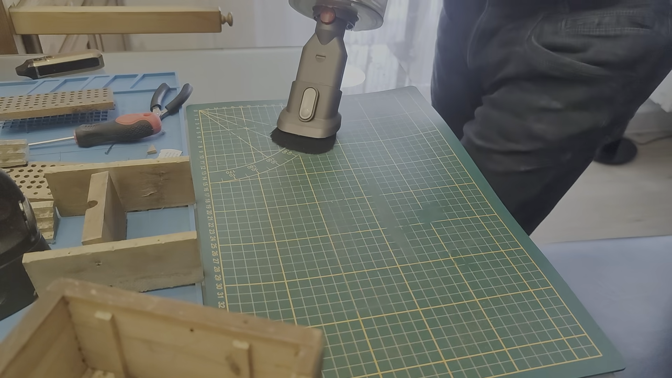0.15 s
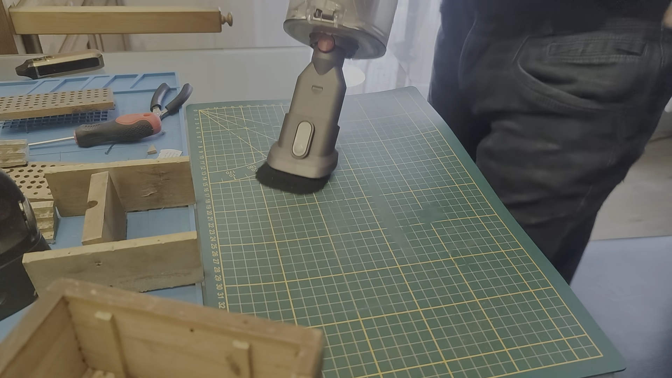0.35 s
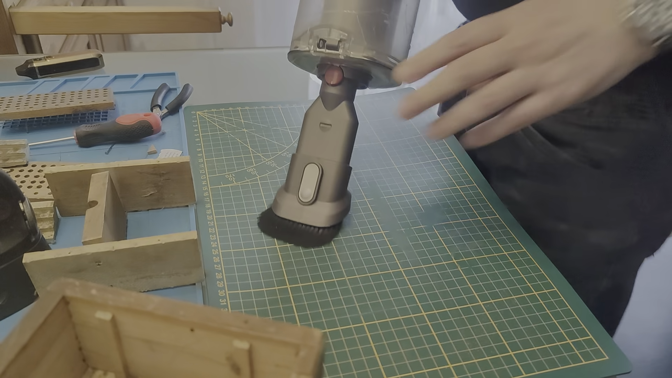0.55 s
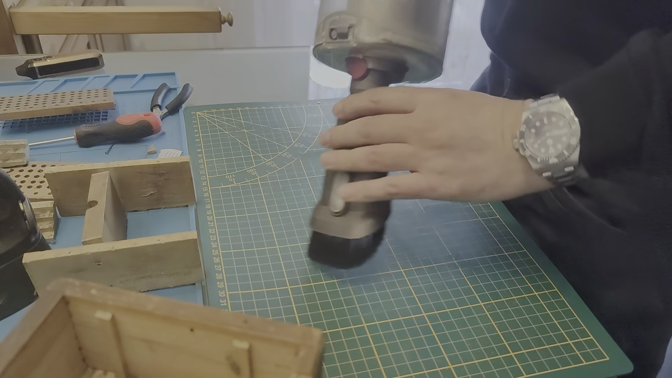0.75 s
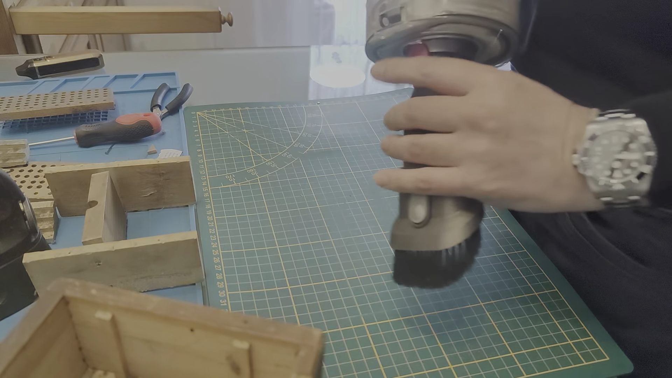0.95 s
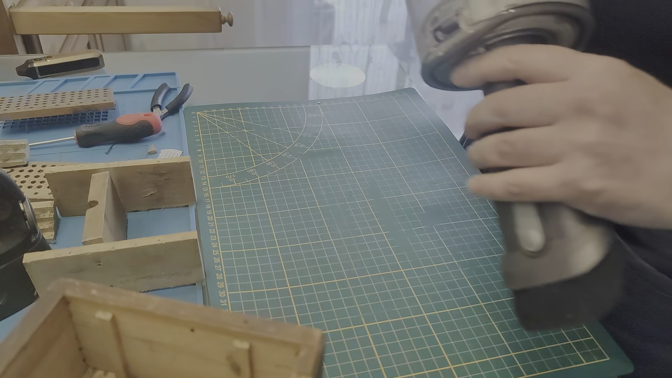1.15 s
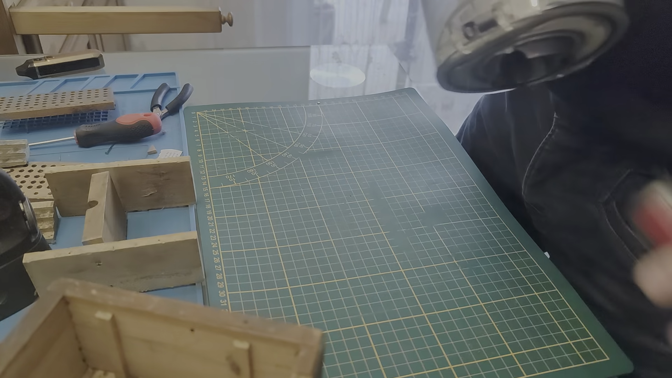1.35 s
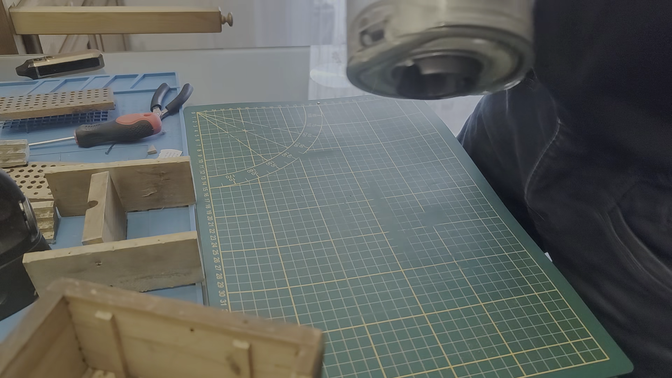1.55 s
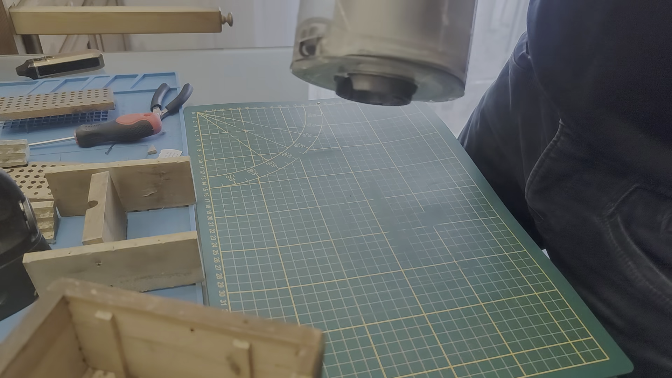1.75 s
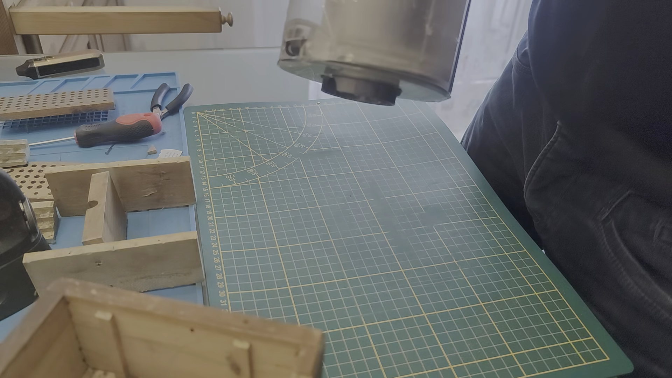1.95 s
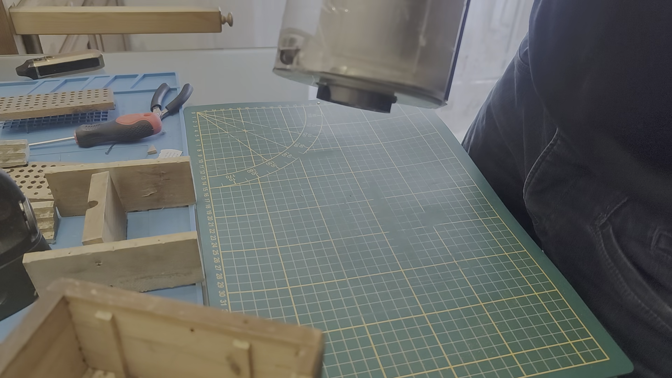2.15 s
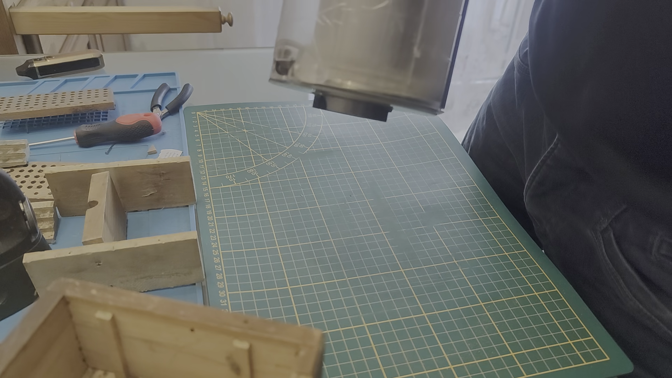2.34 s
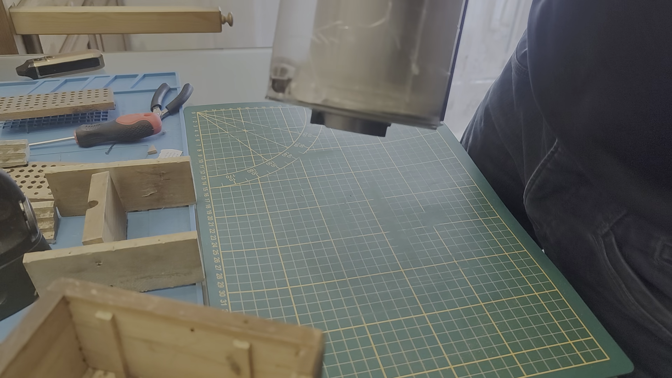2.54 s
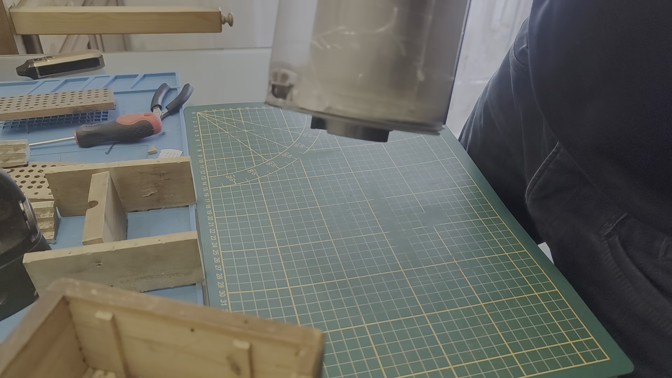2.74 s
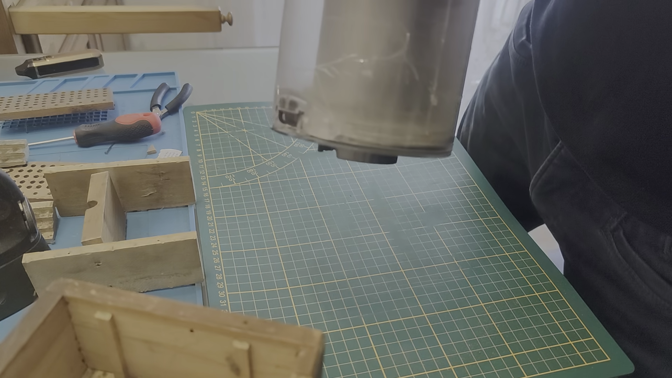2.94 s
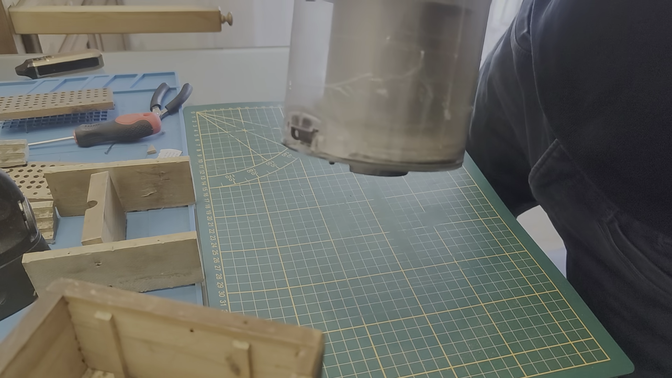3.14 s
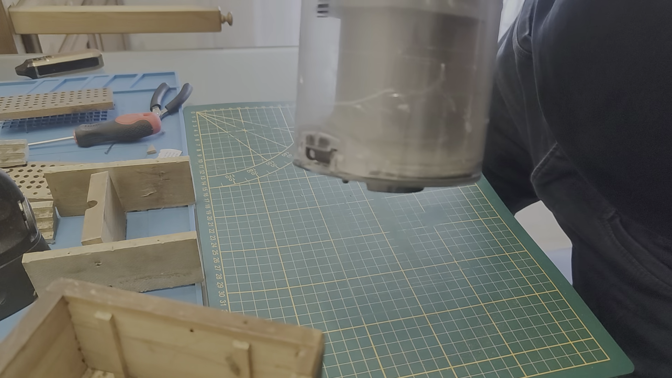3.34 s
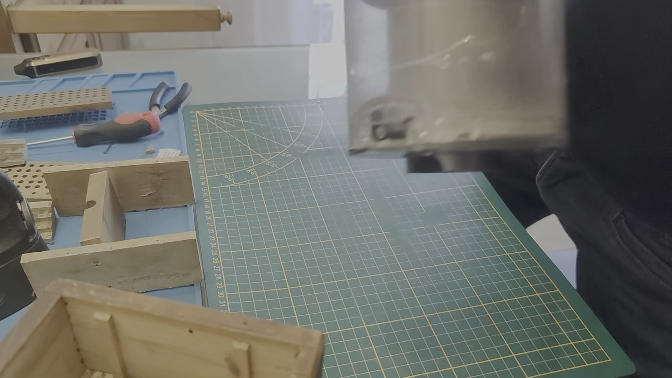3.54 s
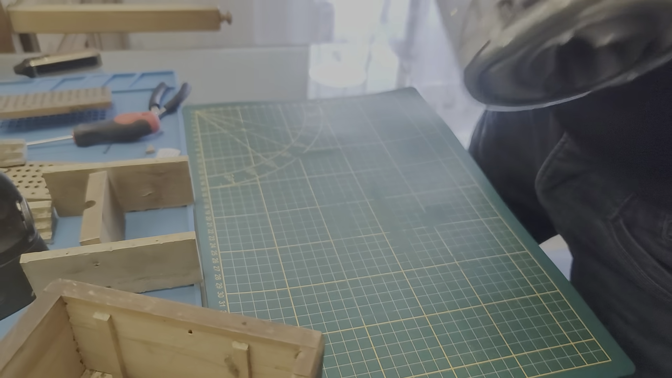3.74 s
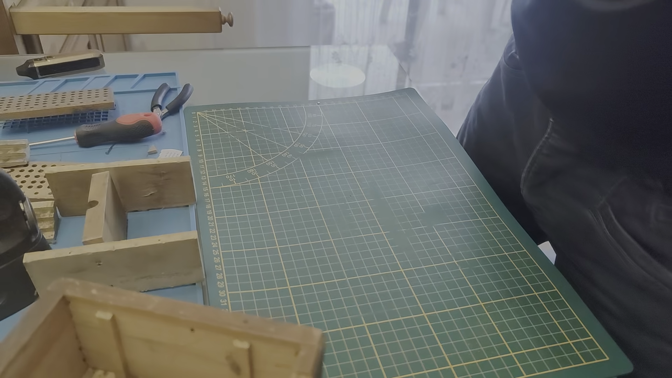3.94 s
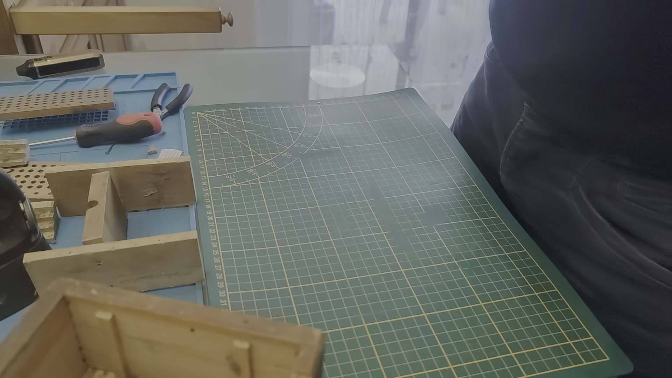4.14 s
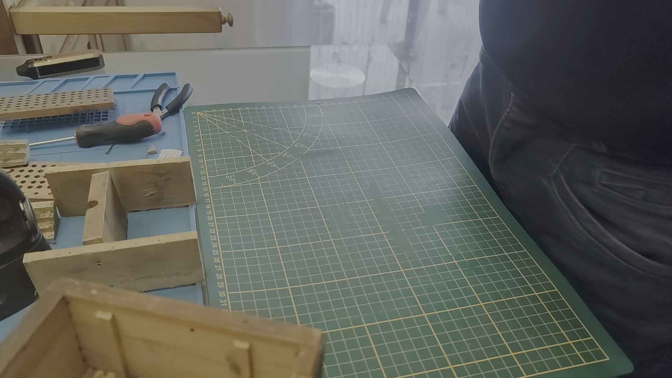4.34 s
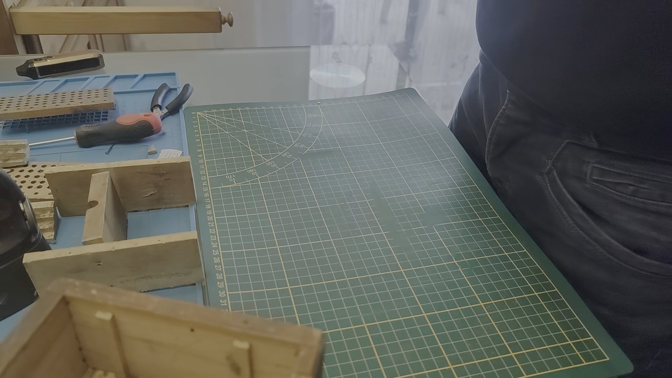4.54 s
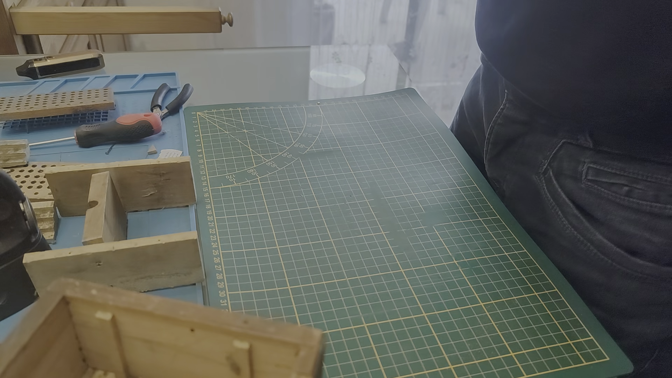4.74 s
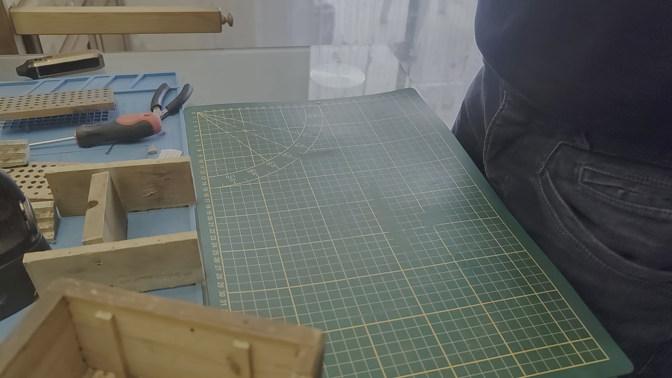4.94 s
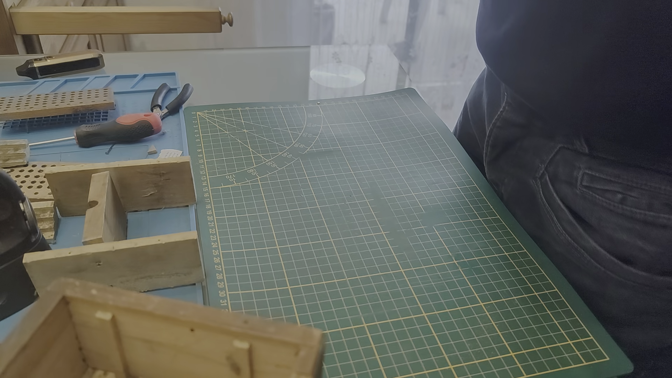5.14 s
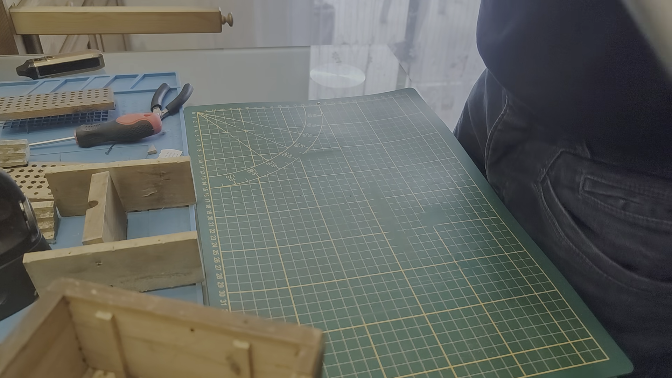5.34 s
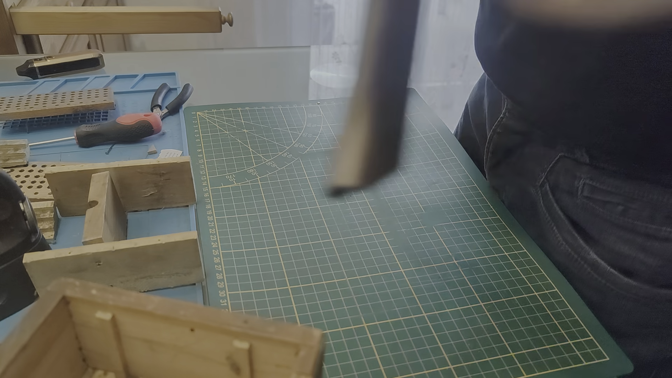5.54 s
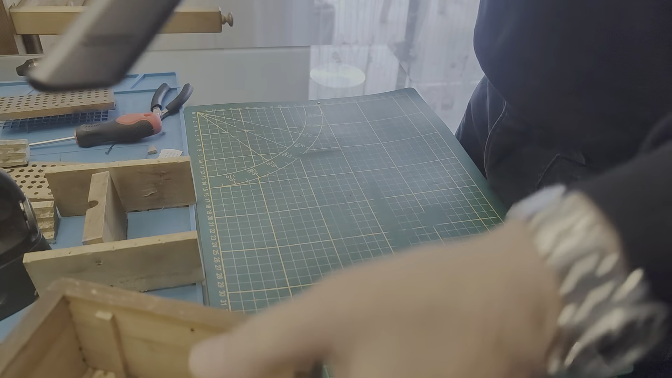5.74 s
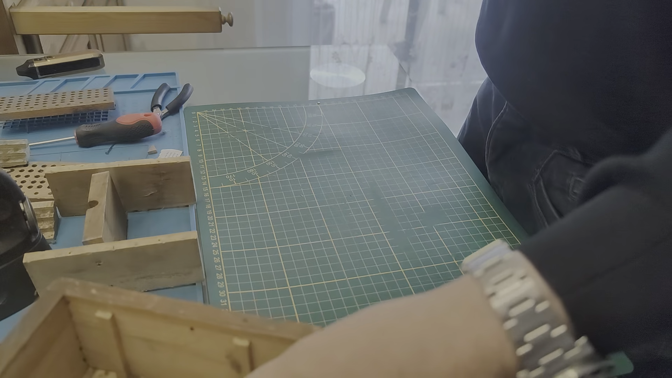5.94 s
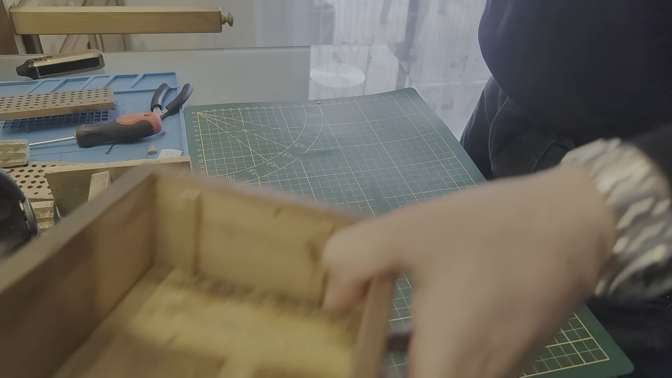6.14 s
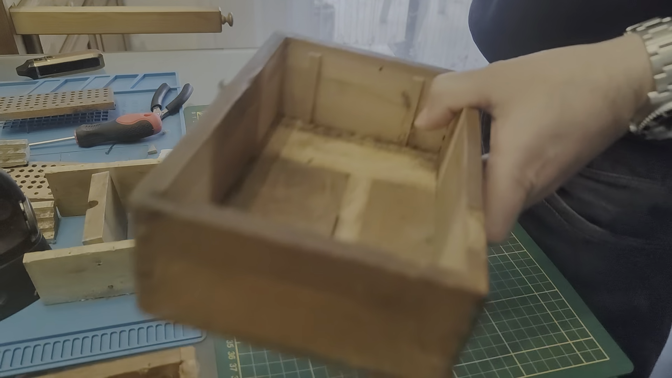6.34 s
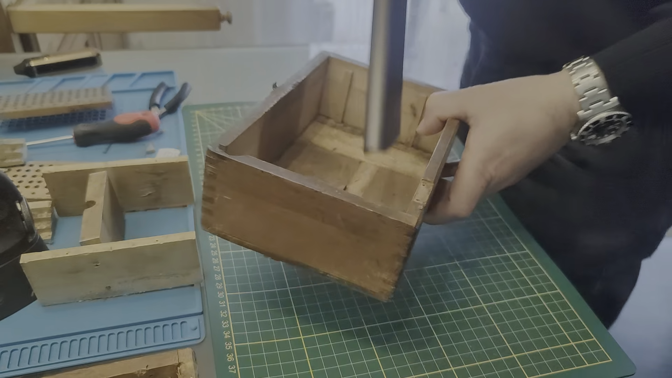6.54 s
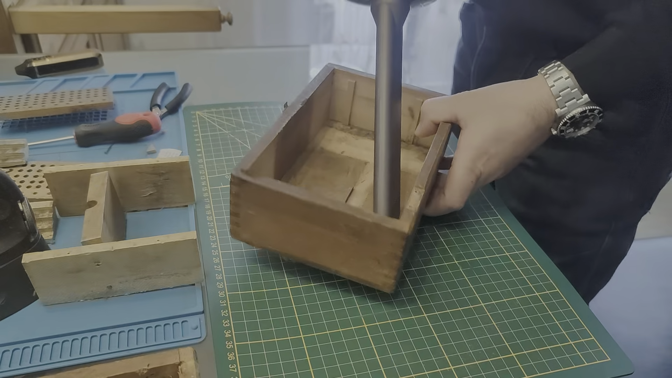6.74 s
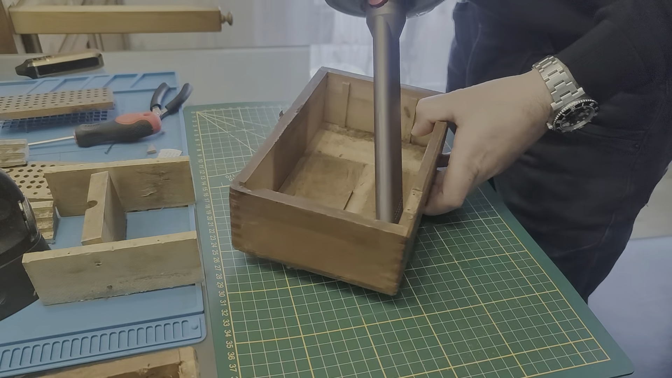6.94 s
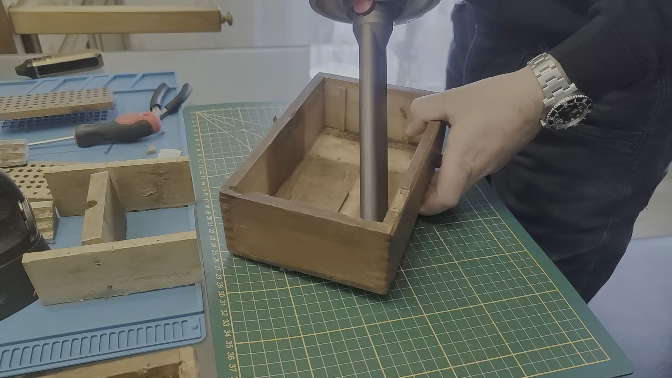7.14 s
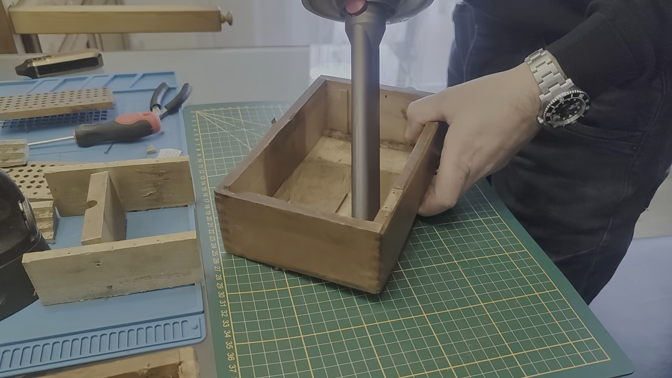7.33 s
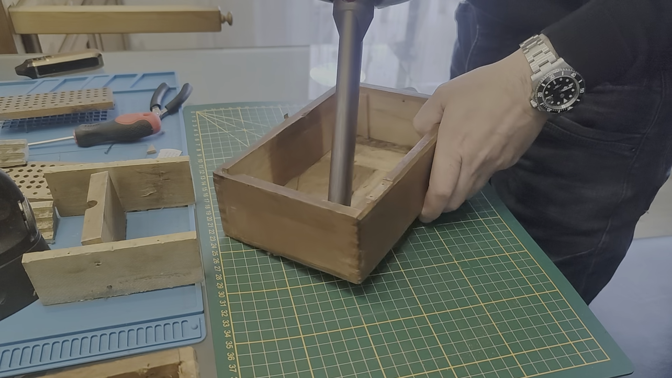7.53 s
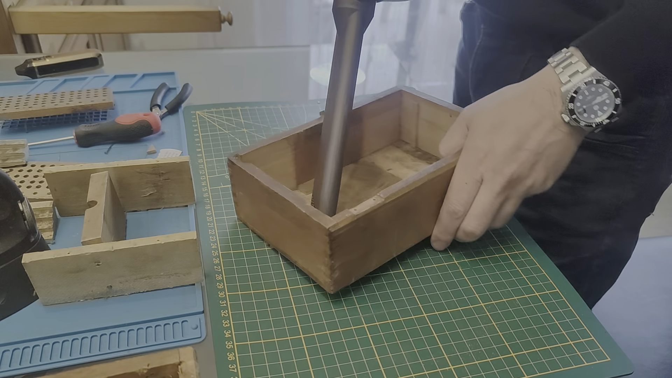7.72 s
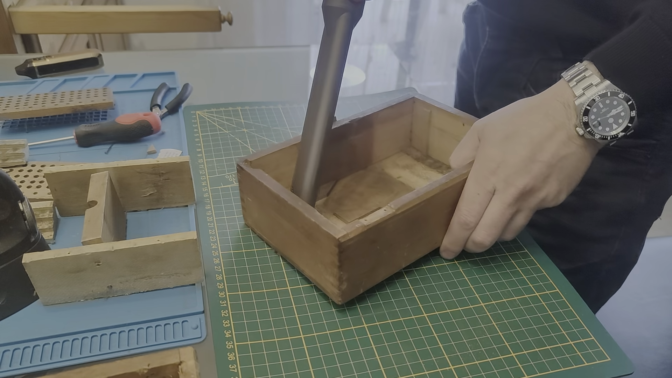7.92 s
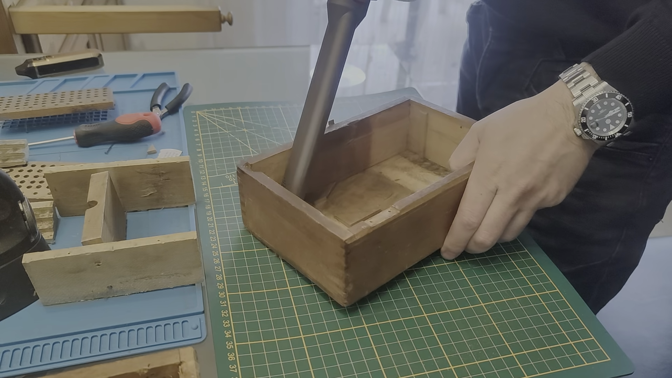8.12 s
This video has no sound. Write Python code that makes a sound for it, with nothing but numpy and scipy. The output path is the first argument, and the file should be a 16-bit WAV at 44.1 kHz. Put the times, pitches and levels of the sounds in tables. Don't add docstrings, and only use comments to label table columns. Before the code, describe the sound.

A handheld vacuum roars and whines, spins down with a fluttering hum, plastic attachments knock and snap into place, then the motor restarts inside a wooden box.

```python
import sys
import numpy as np
from scipy import signal
from scipy.fft import rfft, irfft
from scipy.io import wavfile
from scipy.ndimage import uniform_filter1d

SR = 44100
rng = np.random.default_rng(int(sys.argv[2]) if len(sys.argv) > 2 else 0)


def waveform_to_disk(signal):
    frames = np.transpose(np.atleast_2d(signal))
    scaled = np.clip(frames, -1, 1) * 32767
    samples = np.round(scaled).astype(np.int16)
    wavfile.write(sys.argv[1], SR, samples)


def gain_from_db(level_db):
    decades = np.asarray(level_db, float) / 20
    return 10 ** decades


N = 360738
FRAME, HOP = 512, 128
OFF_S, ON_S = .694, 6.861
FULL_HZ = 1173.8

# hz, likeness [0-1]
LIKENESS = [(60, 0.85), (200, 0.92), (700, 0.41), (1300, 0.18), (2400, 0.65), (4400, 0.033), (9000, 0.065)]
# hz, level_db
HOUSING = [(1700, 1), (2000, 1), (2400, -4), (2900, 1), (3300, -2.5), (3850, 3), (4300, -2), (4650, -6.5),
           (5050, 0)]
# hz, level_db
BLOW_COLOURS = [
    [(70, -30), (275, -2), (523, -6.5), (1010, -3.5), (2100, -10), (3000, -19), (6380, -23.5),
     (14000, -28.5)],
    [(59, -62), (100, -28), (229, -5.5), (360, -14), (523, -22), (1030, -17), (1500, -24), (2500, -20),
     (3500, -29), (14000, -44.5)],
    [(100, -31), (248, -12.5), (550, -12.5), (859, -1), (1050, -12), (2200, -22.5), (3230, -35),
     (14000, -52)],
    [(59, -27), (100, -5.5), (1380, -10), (6790, -23.5), (12600, -30), (14000, -54)],
    [(41, -41), (70, -18), (395, 0), (615, -21), (1200, -19), (2650, -7.5), (6740, -12.5), (14000, -23)],
    [(120, -53), (200, -29), (1180, -22.5), (1750, -7), (2230, -9), (2600, -10), (3900, -11), (4600, -14),
     (6100, -11), (9000, -12.5), (13000, -8), (14000, -12)],
    [(59, -35), (250, -5.5), (743, -5), (972, -4), (1380, -6), (2130, -12.5), (2620, -18.5), (14000, -37)],
]


def evened(x):
    return x / np.sqrt(np.mean(x ** 2) + 1e-20)


def read(points, hz):
    f, value = np.transpose(points)
    return np.interp(np.log(hz + 1), np.log(f + 1), value)


def likeness(hz):
    return np.clip(read(LIKENESS, hz), -1, 1)


def add(mix, s, sound):
    part = mix[round(s * SR):][:len(sound)]
    part += sound[:len(part)]


def gate_between(t, start, end, edge_s):
    return np.clip(np.minimum(t - start, end - t) / edge_s, 0, 1)


def band(colour, lo, hi):
    hz = np.fft.rfftfreq(FRAME, 1 / SR)
    power = gain_from_db(2 * read(colour, hz)) * (hz > lo) * (hz < hi)
    return -10 * np.log10(np.sum(power) / len(hz))


def noise(size, patchy_db, flicker_db):
    frames, hz = N // HOP + 5, np.fft.rfftfreq(FRAME, 1 / SR)[:, None]
    a, b, c, d, patches = rng.standard_normal((frames, len(hz), 5)).T
    flicker = evened(uniform_filter1d(patches[0], size=4))
    patches = uniform_filter1d(patches, size=6, axis=0)
    patches = evened(uniform_filter1d(patches, size=20, axis=1))
    same, left = likeness(hz), a + 1j * b
    right = same * left + np.sqrt(1 - same ** 2) * (c + 1j * d)
    z = np.array([left, right])
    unit = np.std(signal.istft(left[:, :FRAME], nperseg=FRAME, noverlap=FRAME - HOP)[1])
    z *= size(hz, np.arange(frames) * HOP / SR)
    z *= gain_from_db(patchy_db * patches + flicker_db * flicker)
    return signal.istft(z, nperseg=FRAME, noverlap=FRAME - HOP)[1][:, :N] / unit


def ring(modes, rise=.0012):
    t = np.arange(0, min(.5, max(m[2] for m in modes) + .01), 1 / SR)
    x = 0
    for hz, db, t60 in modes:
        x = x + gain_from_db(db - 60 * t / max(t60, .004)) * np.sin(2 * np.pi * (hz * t + rng.random()))
    x = x * (1 - np.exp(-t / rise))
    return x / abs(x).max()


def crack(colour, t60, rise=0.00078):
    t = np.arange(8192) / SR
    spectrum = rfft(rng.standard_normal(len(t)))
    x = irfft(spectrum * gain_from_db(read(colour, np.fft.rfftfreq(len(t), 1 / SR))))
    x = x * gain_from_db(-60 * t / np.clip(t60, .01, .25)) * (1 - np.exp(-t / rise))
    return x / abs(x).max()


def causal(gain_db):
    log_spectrum = np.conj(signal.hilbert(np.log(gain_from_db(gain_db))))
    return np.fft.ifft(np.exp(log_spectrum)).real[..., :1024]


def pulse(colour):
    x = causal(read(colour, abs(np.fft.fftfreq(2048, 1 / SR))))
    return x / np.linalg.norm(x)


def rustle():
    # hz, level_db
    quiet_colour = [(18, -35), (30, -10), (65, -7.5), (304, -10.5), (548, -19.5), (1200, -25.5),
                    (7950, -30), (14000, -27)]
    # hz, level_db
    rub_colour = [(60, -14), (200, 6), (600, 1.5), (1300, -0.5), (2000, 3), (4000, 3.5), (7000, 5),
                  (14000, -4.5)]
    # peak_s, rise_s and fall_s (per 20 dB; a negative rise means fading from the very
    # start), rustle_db, bass_db
    strokes = [(1.06, -0.5, 1.5, -59.5, -77), (1.33, 0.17, .25, -52.5, -49), (1.372, .05, 0.0145, -44, -43),
               (1.64, 0.13, 0.33, -63.5, -56.5), (1.74, 0.04, 1, -65, -55), (2.497, 0.11, 0, -60, -50),
               (3.62, 0.5, 0.2, -65.5, -79), (3.89, 0.4, 0.4, -66, -71.5),
               (4.035, 0.04, 0.07, -62.5, -60.5), (4.175, 0.05, 0.13, -54.5, -50.5),
               (4.58, .03, 0.05, -62, -61), (4.908, 0.16, 0.36, -57.5, -54.5), (5.02, 0.1, 0.11, -54, -47),
               (5.19, 0.07, 0.11, -47, -61), (5.31, 0, 0.07, -56, -60), (5.67, 0.2, 0.05, -59, -68),
               (6.069, 0.06, 0.12, -59.5, -52.5), (6.55, 0.97, .5, -61.5, -69.5), (6.82, 0.18, 1, -61, -60)]
    # start_s, end_s, level_db
    hisses = [
        (3.58, 3.72, -69),
        (5.658, 5.703, -56),
    ]
    quiet_db, hiss_above_hz = -65.5, 8300

    def size(hz, t):
        quiet = gain_from_db(quiet_db + band(quiet_colour, 0, SR / 2) + read(quiet_colour, hz))
        power = 0
        for s, rise, fall, db, bass_db in strokes:
            drop_db = 20 * np.maximum((s - t) / rise, (t - s) / fall)
            power = power + gain_from_db(2 * (np.array([[db], [bass_db]]) - drop_db).clip(-150))
        db, bass_db = 10 * np.log10(power)
        bass = 1 / (1 + (hz / 1400) ** 4)
        level_db = bass * (bass_db + band(rub_colour, 200, 1700))
        level_db = level_db + (1 - bass) * (db - 1.0 + band(rub_colour, 1500, 12000))
        hiss = sum(gain_from_db(d) * gate_between(t, a, b, .008) for a, b, d in hisses)
        hiss = hiss / (1 + (hiss_above_hz / (hz + 1)) ** 30)
        return np.hypot(quiet + hiss, gain_from_db(level_db + read(rub_colour, hz)))
    return noise(size, patchy_db=.8, flicker_db=.8)


def bin_hum():
    # start_s, end_s, pitch_hz, level_db, dip_s (at the end, it hastens the close)
    start, end, hz, db, dip = (3.5, 4.0, 495.5, -71, 4)
    t = np.arange(N) / SR
    gate = gate_between(t, start, end, 0.087) * (1 - .8 * np.exp(-((t - dip) / .03) ** 2))
    return gain_from_db(db) * gate * np.sin(2 * np.pi * hz * t)


def leak():
    # start_s, end_s, centre_hz, width_hz, level_db, fade_db per s
    start, end, centre_hz, width_hz, db, fade_db = (0.8, 2, 5552, 250, -63.5, -8)
    t = np.arange(N) / SR
    b, a = signal.iirpeak(centre_hz, centre_hz / width_hz, SR)
    whistle = evened(signal.lfilter(b, a, rng.standard_normal((2, N))))
    return gate_between(t, start, end, .05) * gain_from_db(db + fade_db * (t - start).clip(0)) * whistle


def thuds():
    # start_s, peak_db, ring_hz, t60_s
    bin_thuds = [(4.275, -31, 131.4, 0.1), (4.562, -54, 240, 0.071), (4.636, -36.5, 132, 0.12),
                 (4.926, -42.5, 129, 0.11), (5.084, -42, 130, 0.2), (4.5, -53.5, 200, .08),
                 (5.25, -52, 125, .1)]
    out = np.zeros(N)
    for s, db, hz, t60 in bin_thuds:
        add(out, s, gain_from_db(db) * ring([(hz, 0, t60), (1.6 * hz, -12, .08)], rise=0.0073))
    return out


def tube_bumps():
    # start_s, peak_db, ring_hz, t60_s
    bumps = [(1.257, -44, 1330, .03), (1.359, -38, 1230, .03), (2.217, -55, 665, .04),
             (2.246, -49, 894, 0.059), (2.462, -54, 980, .04), (2.472, -43, 990, .04),
             (2.484, -42, 1000, 0.049), (4.16, -43, 725, .07), (4.181, -43, 737, .08), (4.24, -51, 630, .1),
             (4.58, -54.5, 720, 0.072), (4.618, -52, 720, .07), (4.704, -31, 713, .08),
             (4.725, -42, 716, .1), (4.753, -44.5, 714, 0.096), (4.787, -48, 697, 0.078),
             (4.854, -43, 705, .1), (4.873, -44, 713, 0.089), (4.892, -44, 714, .1), (4.92, -47, 716, .08),
             (4.94, -41, 713, .08), (4.952, -36, 713, .08), (5.0, -38.5, 830, .05), (5.016, -42, 950, .03),
             (5.032, -30.5, 656, .05), (5.114, -49, 640, 0.1), (5.17, -52, 480, .05),
             (5.201, -50, 720, .06), (6.014, -45, 288, .065), (6.041, -48, 480, .065)]
    out = np.zeros(N)
    for s, db, hz, t60 in bumps:
        modes = [(hz, 0, t60), (.87 * hz, -5, .05), (.47 * hz, -11, .07), (1.7 * hz, -16, .02)]
        add(out, s, gain_from_db(db) * ring(modes, rise=0.00078))
    return out


def rocking():
    # start_s, peak_db
    taps = [(2.547, -39), (2.569, -37.5), (2.597, -46.5), (2.674, -51), (2.707, -45), (2.775, -48.5),
            (2.813, -46.5), (2.882, -52.5), (2.913, -48), (2.987, -53), (3.014, -50.5), (3.094, -55),
            (3.115, -54), (3.186, -54.5)]
    # pitch_hz, level_db, t60_s
    rocker = [(222.6, 6.5, 0.13), (286, 7, 0.3), (310, 0, .15), (349, 0.5, 0.22), (436, 0, 0.068),
              (724, -6, 0.041), (856, 1.5, 0.065), (1070, -2, 0.032), (1336, -5, 0.027)]
    out = np.zeros(N)
    for s, db in taps:
        modes = []
        for hz, d, t60 in rocker:
            mode_db = d + 1.2 * (hz < 500) + rng.uniform(-3, 3)
            modes.append((hz * rng.uniform(0.97, 1.035), mode_db, t60))
        add(out, s, gain_from_db(db + 2.0) * ring(modes, rise=.0004))
        add(out, s, gain_from_db(db - 8.0) * crack(BLOW_COLOURS[2], t60=.02))
    return out


def ticks():
    # start_s, peak_db, ring_hz, ring_db (re tick)
    small_ticks = [(0.8953, -33, 2260, -1), (1.113, -45.5, 3200, -5), (1.258, -39, 1490, -9),
                   (1.3001, -45, 1310, -5), (1.3176, -44, 3730, -5), (1.3595, -29, 1710, -8),
                   (1.3645, -31, 3010, -3), (1.3684, -30.5, 3000, -8), (1.3763, -30, 2820, -9),
                   (1.4464, -32, 2000, -6), (2.707, -49, 1000, -3), (3.8847, -47.5, 2450, -2),
                   (3.9429, -47, 1580, -3.5), (4.0767, -50.5, 6600, -9), (4.161, -50, 6400, -10.5),
                   (4.1894, -37.5, 2200, -9), (4.5717, -41.5, 3600, -9), (4.6181, -37.5, 2670, -16),
                   (4.7046, -40, 3620, -8), (4.7507, -47.5, 1300, -1), (4.948, -23, 5670, -15),
                   (4.999, -20, 3300, -9), (5.033, -36, 1980, -5), (5.2035, -35, 3680, -7),
                   (5.3366, -9, 2950, 1), (5.3392, -13, 1800, 1), (5.6794, -44, 1730, -11),
                   (5.7282, -51.5, 6200, -3), (5.9504, -51, 2040, -10), (6.0013, -55, 2080, -9.5),
                   (6.773, -51, 5900, -2.5)]
    # hz, level_db
    tick_colour = [(200, -9), (1500, -1.5), (4000, -3), (6000, -5), (14000, -10.5)]
    near, far = np.zeros((2, N))
    for s, db, hz, ring_db in small_ticks:
        add(near, s, gain_from_db(db + ring_db) * ring([(hz, 0, .017), (1.6 * hz, -9, .012)], rise=.0004))
        add(near, s + .0008, gain_from_db(db - 3.0) * pulse(tick_colour))
        add(near, s, gain_from_db(db - 3.5) * crack(tick_colour, t60=0.035))
        add(far, s, gain_from_db(db + 8.5) * pulse(tick_colour))
    return near, far


def knocks():
    # start_s, peak_db, blow_t60_s, room_db, snap_db (re blow)
    hits = [
        (1.862, -14, 0.054, -5, -16),
        (2.278, -22, 0.033, -10.5, -7),
        (2.495, -16, 0.051, -7, -5),
        (3.317, -24.5, 0.055, -2, -21.5),
        (3.3296, -22, 0.13, -7, -11),
        (5.334, -11, 0.04, 8.5, 17),
        (6.83, -12, 0.071, -7.5, -7),
    ]
    # pitch_hz, level_db, t60_s
    bodies = [
        [(969, 2, 0.067), (1380, -6, 0.11), (240, -11.5, 0.21)],
        [(222, 2, 0.23), (211, -2, .3), (441, -7.5, 0.24), (920, 9, 0.027), (2110, -3, .03)],
        [(226.4, -5.5, 0.25), (290, -2, 0.4), (801, 2, 0.05), (1000, -1, 0.037), (1296, 1, 0.064)],
        [(815, -1, 0.14), (390, -4, 0.08), (250, -4, .12)],
        [(420, 4.5, 0.079), (1360, 1, 0.09), (1055, 1.5, 0.1)],
        [(1760, 3.5, 0.04), (2260, 0, .04), (3950, -0.5, .03), (2920, 8, 0.017), (5670, 0.5, 0.037)],
        [(1000, 1.5, 0.056), (1330, 6.5, 0.024), (1540, 2, .012), (2700, -3, .015), (3400, -3, .018),
         (5900, -12, .015), (306, -5, 0.11)],
    ]
    near, far = np.zeros((2, N))
    for (s, db, t60, room_db, snap_db), colour, modes in zip(hits, BLOW_COLOURS, bodies):
        body, snap = gain_from_db(-3.5) * ring(modes), pulse(colour)
        add(near, s, gain_from_db(db - 4.0) * body)
        add(near, s, gain_from_db(db - 5.0) * crack(colour, t60, rise=0.0017))
        add(near, s + .0027, gain_from_db(db + snap_db) * snap / abs(snap).max())
        add(far, s, gain_from_db(db + room_db + 16.5) * snap)
        add(far, s, gain_from_db(db - 16) * body)
    return near, far


def flap():
    # time_s, pitch_hz, level_db, third_overtone_db
    hum = [
        (0.92, 136, -56, -60),
        (0.974, 136, -40, -59),
        (1.046, 136, -40, -59),
        (1.116, 149, -54, -64),
        (1.25, 153, -53, -63),
        (1.442, 157, -55, -72),
        (1.816, 158, -59, -76),
        (1.9, 160, -62, -78),
        (2.25, 162, -65, -80),
    ]
    second_db, second_fade_db = -16, -30
    t = np.arange(N) / SR
    s, *curves = np.transpose(hum)
    hz, db, third_db = [np.interp(t, s, curve) for curve in curves]
    turn = 2 * np.pi * np.cumsum(hz) / SR
    flutter_db = 1.5 * evened(uniform_filter1d(rng.standard_normal((2, N)), size=1500, axis=1))
    second = gain_from_db(second_db + second_fade_db * (t - s[0]).clip(0)) * np.sin(2 * turn)
    low = gain_from_db(db + 2 + flutter_db[0]) * (np.sin(turn) + second)
    third = gain_from_db(third_db + .5 + 2 * flutter_db[1]) * np.sin(3 * turn)
    return gate_between(t, s[0], s[-1], .015) * (low + third)


def speed(t):
    first_hz, coast_s, drag_hz = 1169.4, .225, 100
    ramp_hz_per_s, creep_hz, creep_s = 11700, 372, .1
    sag_s, sag_hz = 7.78, 1.4
    since = (t - ON_S).clip(0)
    first = (first_hz + drag_hz) * np.exp(-(t - OFF_S).clip(0) / coast_s) - drag_hz
    sag = sag_hz * np.clip((t - sag_s) / 0.067, 0, 1)
    second = np.minimum(ramp_hz_per_s * since, FULL_HZ - creep_hz * np.exp(-since / creep_s) - sag)
    return np.array([first, second]).clip(1)


def airflow():
    # hz, level_db
    roar = [(40, -36.5), (95, -20.5), (135, 6.5), (180, -5.5), (230, -0.5), (500, -7), (1000, -2),
            (1500, -9.5), (2000, -5.5), (3600, -3), (5600, 1.5), (6350, 7.5), (7400, 2), (14000, 3.5)]
    # airflow_db, bass_db and treble_db (re airflow), treble_drift_db per s, lag (factor on the dB-
    # per-dB speed law above the bass)
    air_runs = [
        (-23, -12.5, -14.5, -0.3, 1.08),
        (-22.5, -14, -14.5, -1.5, 2.3),
    ]
    air_law, bass_law, treble_law = 2.18, 1.15, 2.5
    surge_db, surge_s, gust_db = 6, 0.29, 0.4

    def size(hz, t):
        total, since = 0, (t - ON_S).clip(0)
        gust = gust_db * evened(uniform_filter1d(rng.standard_normal(len(t)), size=24))
        bass, treble = 1 / (1 + (hz / 1300) ** 4), 1 / (1 + (8000 / (hz + 1)) ** 12)
        slow = 1 / (1 + (hz / 3000) ** 2)
        speeds_db = 20 * np.log10(speed(t) / FULL_HZ)
        surges = 0, surge_db * np.exp(-since / surge_s)
        for run, speed_db, age, surge in zip(air_runs, speeds_db, (t, since), surges):
            db, bass_db, treble_db, drift_db, lag = run
            quick_law = air_law + treble * (treble_law - air_law)
            law = slow * bass_law + lag * (1 - slow) * quick_law
            tilt_db = bass * (bass_db + 11.0) + treble * (treble_db + 9.0 + drift_db * age)
            total = total + gain_from_db(db + tilt_db + law * speed_db + (1 - bass) * (surge + gust))
        colour_db = read(roar, hz) + 0.53 * read(HOUSING, hz)
        return total * gain_from_db(colour_db + band(roar, 1500, 8020) - 3.5)
    return noise(size, patchy_db=1.2, flicker_db=.4)


def motor():
    # time_s, half_length_s, whine_change_db, shaft_change_db
    turns = [(0.07, .02, -11, 0), (.2, 0.11, 1, 4), (0.443, 0.14, -6, -1), (.655, .04, -7, 8),
             (.78, 0.044, 3, 3), (.85, .04, 3, 9.5), (6.92, .035, -8, 0), (7.042, .05, 1, 4.5),
             (7.2, .07, 3, -6), (7.334, .04, -2, 8), (7.39, 0.022, -17, -6), (7.46, 0.058, 1.5, -17),
             (7.564, .02, -15, -2), (7.66, 0.033, -10, -6), (7.975, 0.21, -7.5, 7.5), (7.1, 0.042, -9, 2)]
    blades, neighbour_db = 9, -13
    whine_level_db, whine_law = -38, 3.2
    shaft_level_db, shaft_law = -52, 0.27
    t = np.arange(N) / SR
    wobble = evened(uniform_filter1d(rng.standard_normal(N), size=900))
    hz = uniform_filter1d(speed(t).max(0), size=600)
    speed_db, coarse = 20 * np.log10(hz / FULL_HZ), t[::HOP]
    shifts = sum(np.outer(change, np.exp(-((coarse - s) / half) ** 2)) for s, half, *change in turns)
    whine_shift, shaft_shift = (np.interp(t, coarse, shift) for shift in shifts)
    gate = np.clip(np.maximum(.9 - t, t - ON_S) / .015, 0, 1)
    port_phase = np.array([[0], [.2]])
    turn = 2 * np.pi * np.cumsum(hz * (1 + .0007 * wobble)) / SR + port_phase
    whine = np.sin(blades * turn) + gain_from_db(neighbour_db) * np.sin((blades + 1) * turn)
    whine_db = whine_shift + whine_level_db + whine_law * speed_db + 11.0
    shaft_db = shaft_shift + shaft_level_db + shaft_law * speed_db
    return gate * (gain_from_db(whine_db) * whine + gain_from_db(shaft_db) * np.sin(turn))


def placed(x):
    # time_s, left_minus_right_db
    hands = [(1.3, -3), (1.9, -3), (2.3, -2), (2.5, -4), (2.6, -2), (3.3, -2.5), (4.2, -5), (4.7, -6),
             (5, -4.5), (5.3, 0.5), (6.8, -1)]
    left_lag = 3
    pan_db = np.interp(np.arange(N) / SR, *np.transpose(hands)) / 2
    return np.array([gain_from_db(pan_db) * np.roll(x, left_lag), gain_from_db(-pan_db) * x])


def room(x):
    # hz, t60_s
    decay = [(100, 0.54), (500, 0.52), (1500, 0.49), (5500, 0.49), (8000, 0.38), (12500, .3), (14000, 0.2)]
    build_s = .012
    echoes = np.zeros((2, SR))
    at = np.arange(160, SR - 20, 20) + rng.integers(0, 20, (2, (SR - 161) // 20))
    np.put_along_axis(echoes, at, rng.choice([-1., 1.], at.shape), 1)
    hz, t, z = signal.stft(echoes, SR, nperseg=256)
    same = likeness(hz)[:, None]
    z[1] = same * z[0] + np.sqrt(1 - same ** 2) * z[1]
    tail = signal.istft(z * gain_from_db(-60 * t / read(decay, hz)[:, None]), SR, nperseg=256)[1]
    tail = tail * np.sqrt(1 - np.exp(-np.arange(tail.shape[1]) / SR / build_s))
    return signal.fftconvolve(x[None], tail / np.linalg.norm(tail[0]), axes=1)[:, :N]


def scene():
    near, far = knocks()
    tick, tick_far = ticks()
    small = rocking() + tube_bumps() + thuds()
    air, tones = airflow(), motor()
    walls = far + tick_far + gain_from_db(-7.5) * small + gain_from_db(-13.5) * tones[0] + gain_from_db(-11.5) * air[0]
    background = rustle() + bin_hum() + leak()
    return background + placed(near + tick + small) + room(walls) + flap() + gain_from_db(-0.82) * air + tones


def overload():
    # start_s, kick_height, drift_height, reset_s, reset_height
    port_overloads = [
        (5.3355, .04, .004, 5.533, .012),
        (5.3355, .06, .008, 5.5483, .017),
    ]
    t, out = np.arange(N) / SR, []
    for start, kick, drift, reset, blip in port_overloads:
        u, v, since = (t - start) / .0012, (t - reset) / .0012, (t - start).clip(0)
        slow = drift * (np.exp(-since / .25) - 2.4 * np.exp(-since / .045)) * (t > start) * (t < reset)
        rebound = -.3 * kick * np.exp(-(u - 2.8) ** 2 / 2)
        reset_blip = -1.65 * blip * v * np.exp(-v ** 2 / 2)
        out.append(kick * np.exp(-u ** 2 / 2) + rebound + slow + reset_blip)
    return np.array(out)


def squeezed(x):
    knee, ceiling = .75, .96
    over, span = (abs(x) - knee).clip(0), ceiling - knee
    return x - np.sign(x) * (over - span * np.tanh(over / span))


def dropouts(x):
    below_db, above_hz = -3.3, 2000
    hz, t, z = signal.stft(x, SR, nperseg=1024, noverlap=768)
    power = uniform_filter1d(uniform_filter1d(abs(z) ** 2, size=4, axis=1), size=4, axis=2)
    band_db = 10 * np.log10(power.clip(1e-20))
    around_db = uniform_filter1d(band_db, size=40, axis=1)
    weak = (band_db < below_db + around_db) & (hz[:, None] > above_hz)
    kept = 1 - .985 * np.minimum(2 * uniform_filter1d(1. * weak, size=4, axis=2), 1)
    return signal.istft(z * kept, SR, nperseg=1024, noverlap=768)[1][:, :N]


def roll_off(x):
    return signal.sosfilt(signal.butter(12, 15620, fs=SR, output="sos"), x)


def record(dry):
    # hz, level_db
    left_port = [(30, -7), (200, 2), (1200, 4), (4500, 3.5), (6400, -2.5), (7400, -1), (8050, -7.5),
                 (8500, -2.5), (9500, -0.5), (13000, -1), (14100, -1)]
    # hz, level_db
    right_port = [(30, -6.5), (200, 0.5), (1200, 2), (4600, 5), (5500, 5), (6300, 11), (7200, 0),
                  (7900, -16), (8800, -24), (9700, -11), (10400, -8), (10900, -13.5), (11700, -4),
                  (12800, -7), (14100, -1.5)]
    hz = abs(np.fft.fftfreq(2048, 1 / SR))
    colours_db = np.array([read(left_port, hz), read(right_port, hz)])
    ports = causal(colours_db + 0.37 * read(HOUSING, hz))
    x = squeezed(signal.oaconvolve(dry, ports, axes=1)[:, :N] + overload())
    band_limit = signal.firwin(511, 14230, window=("kaiser", 6), fs=SR)
    x = signal.oaconvolve(x, band_limit[None], "same", axes=1)
    return roll_off(dropouts(x))


dry = scene()
out = record(dry)
waveform_to_disk(out)
```